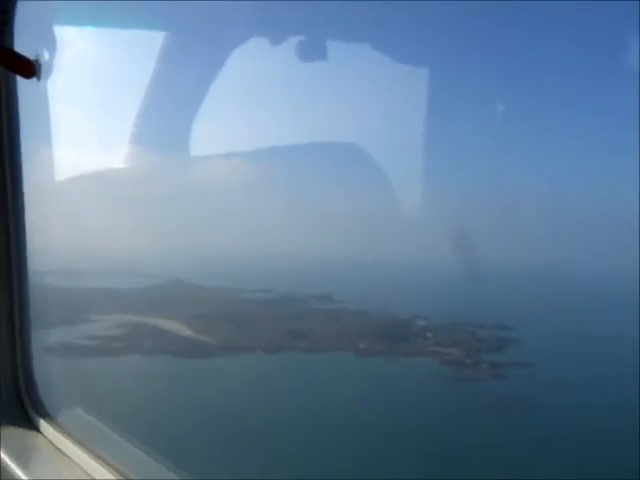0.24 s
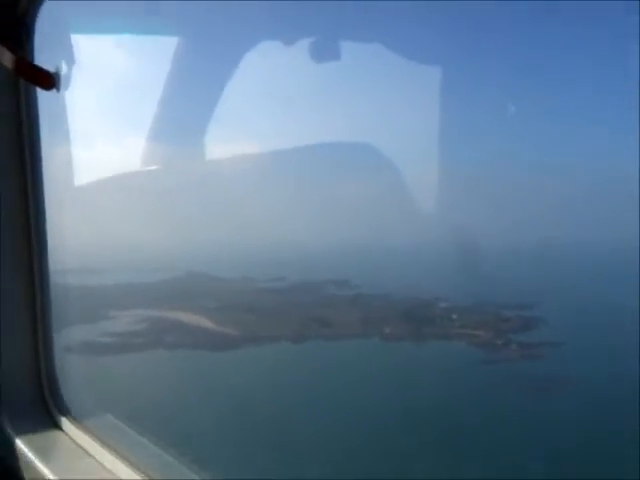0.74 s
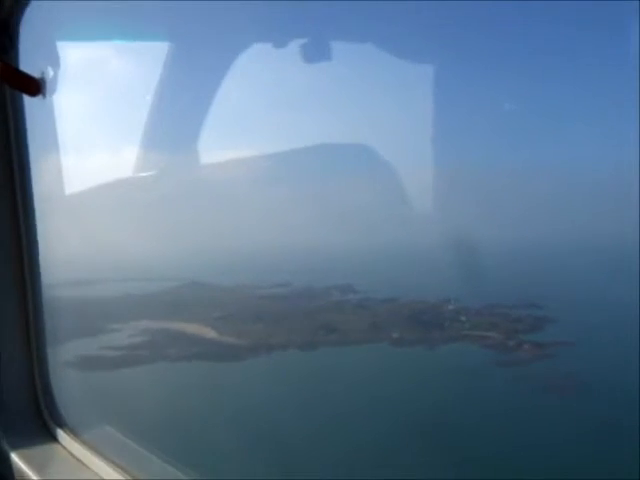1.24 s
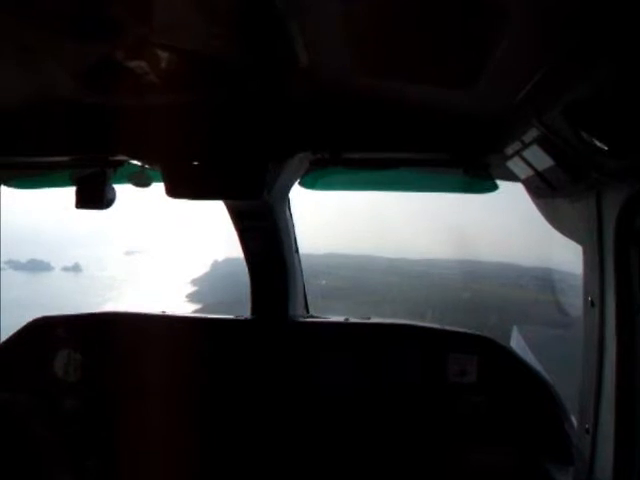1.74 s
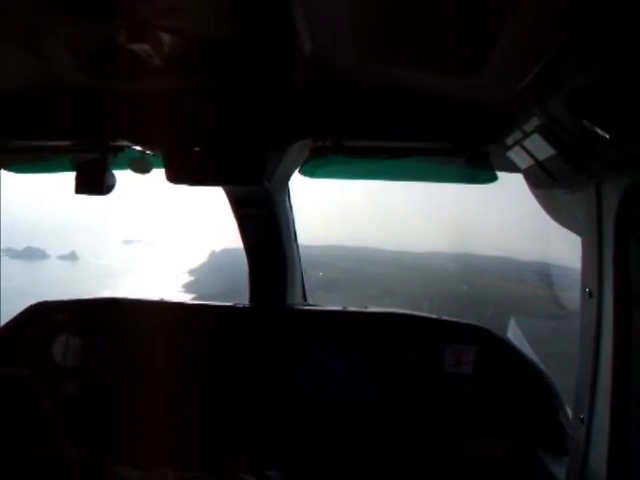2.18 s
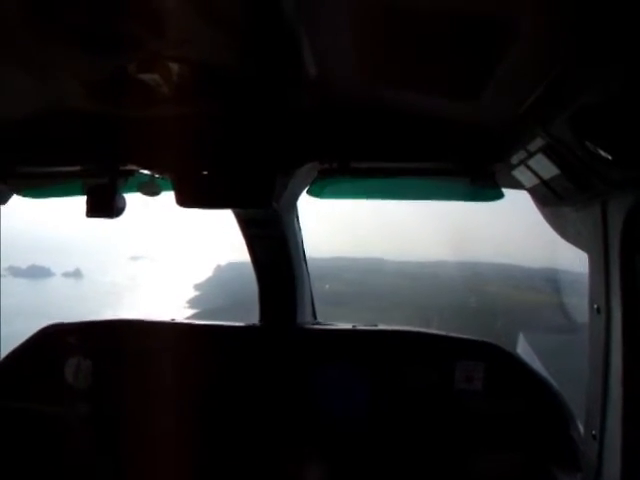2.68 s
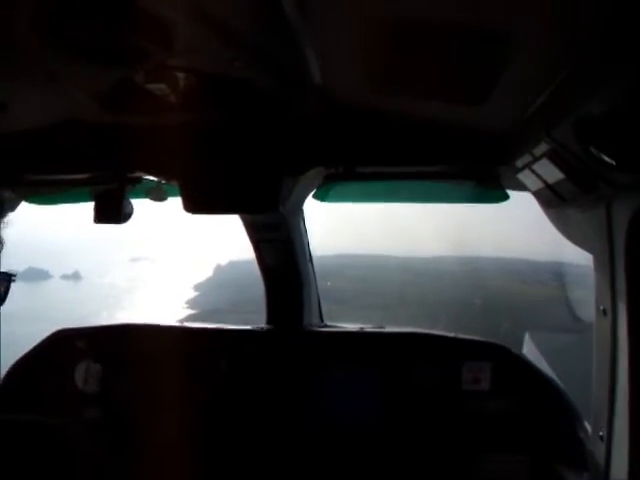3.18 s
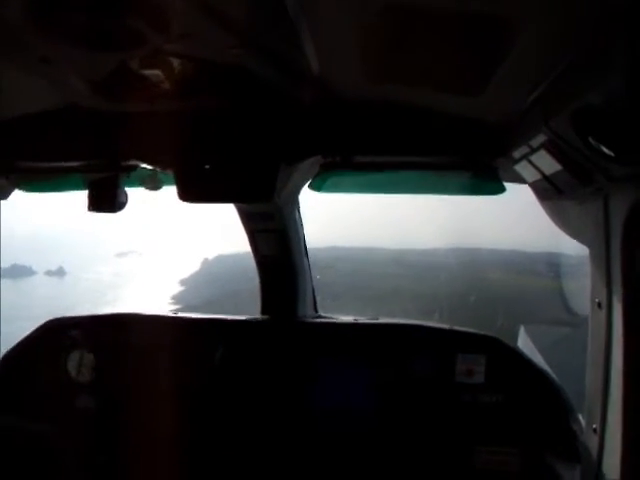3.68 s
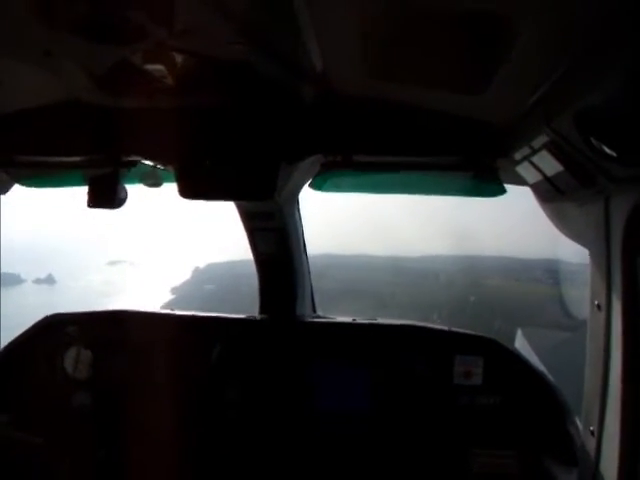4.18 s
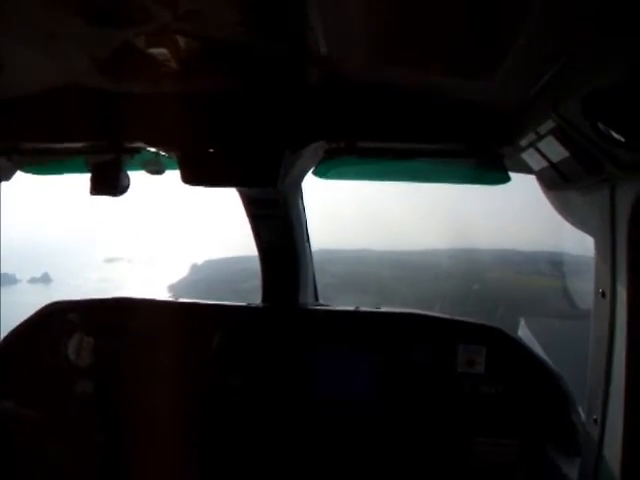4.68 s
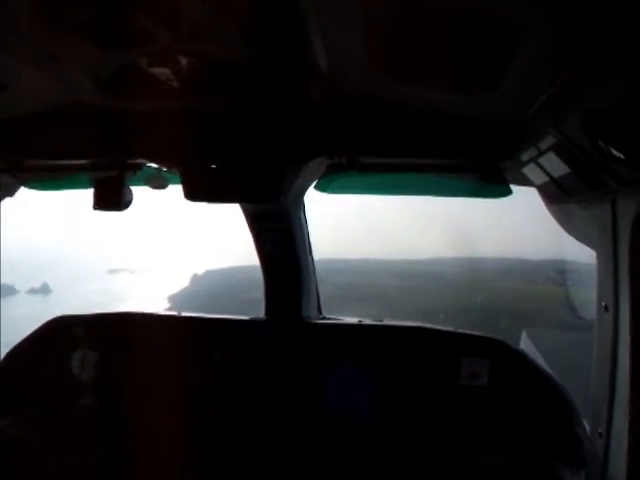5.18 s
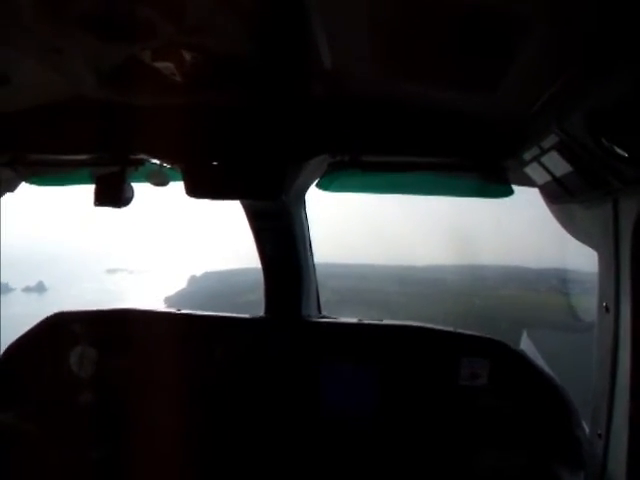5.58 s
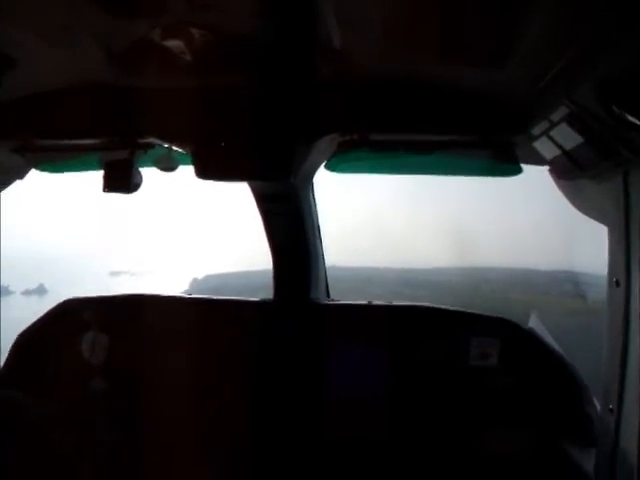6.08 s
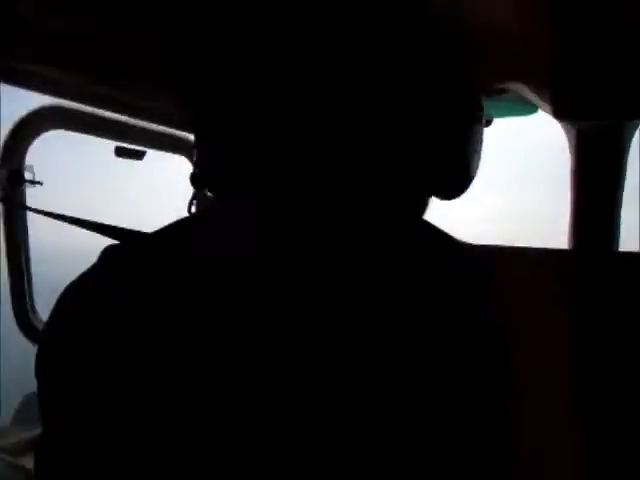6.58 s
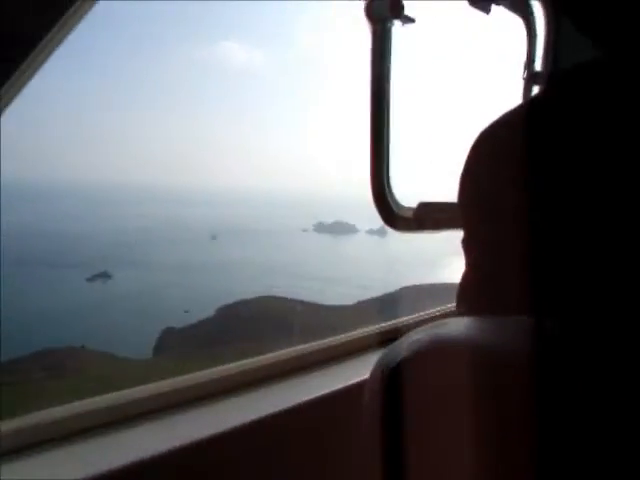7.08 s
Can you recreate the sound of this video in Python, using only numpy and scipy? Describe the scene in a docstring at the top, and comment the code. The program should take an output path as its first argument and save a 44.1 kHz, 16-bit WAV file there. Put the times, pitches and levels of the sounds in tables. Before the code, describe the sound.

Inside the cabin of a small twin-engine propeller plane, a low, lumpy drone sits under a broad rush of air near the side window. After a second or so a tiny gap cuts it off; a stronger, higher, buzzing drone snaps in, climbs slightly and throbs rapidly, hiss pumping along. Near the end the microphone swings to the side window, changing the buzz's colour and softening the rush.

```python
"""Inside the cabin of a twin piston aircraft with six-cylinder engines and three-blade propellers.
First the engines cruise almost in step: fluttering sines make a lumpy drone under a rush of filtered noise.
A silence of 24 ms follows; then the engines turn faster and out of step, their blade tones beat at roughly
7 to 13 Hz, and a limiter pumps the hiss along with the throb. Towards the end the microphone swings round
to the side window, so each harmonic passes through its own nodes and the rush of air weakens."""
import sys
import numpy as np
from scipy import signal
from scipy.fft import rfft, irfft
from scipy.io import wavfile

SR = 44100
rng = np.random.default_rng(int(sys.argv[2]) if len(sys.argv) > 2 else 0)


def wrap_up_sound(samples):
    """Save the sound to the file named by the first command line argument, as 16-bit audio."""
    columns = np.atleast_2d(samples).T
    # keep every value between -1 and 1, then stretch to whole-number steps
    tamed = np.clip(columns, -1, 1)
    steps = np.round(tamed * 32767).astype(np.int16)
    wavfile.write(sys.argv[1], SR, steps)


N = 323241
TIME = np.arange(N) / SR  # s

# Levels in the tables hold before the gain of each stretch and the limiter.
# Layers of the rush of air, edges from low to high: [f/Hz]
RUSH_EDGES_HZ = [10, 1250, 4500, 8300]
# Spectral shape of air and structure noise, which sets the balance inside each layer: [f/Hz, level/dB per Hz]
CRUISE_AIR = [(12, -50.5), (110, -44.5), (200, -51.5), (420, -55.5), (680, -62), (880, -66.5),
              (1270, -68.5), (1560, -65), (1900, -71), (2600, -68), (4200, -72.5), (5400, -78), (7400, -81)]
FAST_AIR = [(12, -56.5), (22, -42.5), (50, -48.5), (100, -53.5), (160, -51.5), (230, -57), (480, -63.5),
            (750, -71), (980, -68), (1300, -75.5), (3600, -76), (5300, -76.5), (6400, -76), (7400, -78)]
# Rms of the layers in steady airflow: [roar level/dB, middle level/dB, hiss level/dB]
CRUISE_RUSH_DB = (-27.5, -36, -45)
FAST_RUSH_DB = (-27.5, -40.5, -40.5)
# Change of the layers at the side window: [roar level/dB, middle level/dB, hiss level/dB]
WINDOW_DB = (-5, -2.5, -1)
# Strength of the airflow in the fast stretch: [t/s, level/dB]
AIRFLOW = [(1.37, 1), (1.5, 4.5), (1.75, 3), (2.1, 1.0), (3.4, -1.4), (4.8, .7), (6.0, -0.4), (6.8, 0),
           (7.33, -1.5)]
# Air leaks in the cruise: [f/Hz, bandwidth/Hz, level/dB against the roar]
CRUISE_LEAKS = [(1014, 95, -11), (1161, 84, -18.5)]
# Air leaks in the fast stretch: [f/Hz, bandwidth/Hz, level/dB against the hiss]
FAST_LEAKS = [(4690, 260, -12.5), (6210, 200, -11.5)]
# Low wavering hum under the fast stretch: [f/Hz, rms level/dB]
HUM = [(40.5, -54), (75.2, -28), (112.8, -31)]
# Engine lines; every sixth is a blade-pass and firing harmonic: [multiple of the four-stroke cycle, rms level/dB]
CRUISE_ORDERS = [(1, -30), (2, -29), (3, -35), (4, -26.5), (5, -38), (8, -37), (9, -31), (10, -43.5),
                 (11, -38), (18, -46), (22, -45.5), (30, -50)]
LEAD_ORDERS = [(1, -36), (2, -51), (3, -30.5), (5, -41), (6, -12), (8, -42.5), (9, -42.5), (10, -51),
               (11, -44.5), (12, -22), (15, -54), (18, -39), (24, -32.5), (30, -38.5), (36, -46.5),
               (42, -42), (48, -48), (54, -55.5), (60, -55.5), (66, -60), (72, -56), (78, -64.5),
               (84, -57.5), (90, -62.5)]
SLOW_ORDERS = [(3, -34), (4, -40), (6, -20), (12, -39.5), (18, -48), (24, -56), (30, -60.5), (36, -55.5)]
# Cruise tones of the two engines: [blade harmonic, rms level/dB of the first, share of the second (0-1)]
CRUISE_TONES = [(1, -23.5, 0.87), (2, -20.5, 0.25)]
# Moment at which the two engines oppose each other, one for each cruise tone: [t/s]
CANCEL_S = (.31, .51)
# Blade-pass frequency of the leading and the slower propeller in the fast stretch: [t/s, f/Hz]
LEAD_SPEED = [(1.36, 126.92), (1.6, 130.71), (2.0, 134.49), (2.45, 136.62), (3.0, 136.54), (4.3, 133.61),
              (5.5, 134.09), (7.33, 133.0)]
SLOW_SPEED = [(1.36, 119.45), (1.65, 124.1), (3.0, 124.1), (5.7, 121.92), (7.33, 119.6)]
# Cabin peaks and dips that the harmonics slide through: [f/Hz, half width/Hz, level/dB]
CABIN_MODES = [(257.3, 8, 2.5), (273.2, 4.7, -2), (522, 9.1, 5), (540, 2.7, 1.5), (630, 14, -6),
               (774, 18, 6.5), (822, 5.8, 5), (900, 13, -2), (958, 13, -7.5), (1915, 16, 3)]
# Nodes and antinodes met in the swing: [engine order, t/s, half width/s, dip or peak level/dB, later change/dB]
NODES = [(12, 6.71, .14, -11, -4), (18, 6.8, 0.16, -9.5, 6), (24, 6.55, .3, -2, -2.5),
         (30, 7.05, .4, -4.5, -0.5), (36, 6.5, 0.23, 6.5, 2), (36, 6.83, 0.095, -10.5, -0.5),
         (42, 7.4, .12, -2, -5), (48, 6.73, .08, -9, -2), (54, 6.85, .1, -2, 5.5), (60, 5.9, .15, -8, -3),
         (72, 6.68, .12, -7, -1), (84, 7.05, 0.27, -14, 5)]

BREAK_FROM_S, BREAK_TO_S = 1.335, 1.359
CRUISE_HZ = 114.5  # blade passes per second
CRUISE_SLIP_HZ = 0.67  # lag of the second engine, in blade passes per second
GUST_S, GUST_WIDTH_S, GUST_DB = 0.47, 0.19, 2.5  # one gust at the side window in the cruise
CRUISE_EASE_DB_PER_S = 1.9  # fall of the middle layer through the cruise
RASP_FROM_HZ, RASP_DB_PER_HZ, RASP_FROM_ORDER = 134.0, 2.5, 54
TURN_S, TURN_LENGTH_S = 6.33, 0.3  # swing of the microphone as the harmonics meet it: middle, length
WINDOW_S, WINDOW_FADE_S = 6.5, 0.7  # weakening of the rush at the window: middle, length
NARROW_BAND_HZ, CUTOFF_HZ = 8500, 16000  # stopband edges of the two low-pass filters


def from_db(db):
    """Logarithmic level: decibels to an amplitude ratio."""
    return 10 ** (np.asarray(db) / 20)


def rms_one(x):
    """Normalization: scale a signal to unit rms."""
    return x / np.sqrt(np.mean(x ** 2) + 1e-20)


def in_time(rows):
    """Linear interpolation: each column of a curve table at every sample."""
    s, *columns = np.transpose(rows)
    return [np.interp(TIME, s, column) for column in columns]


def bell(x, centre, width):
    """Gaussian curve: a smooth bump of height 1."""
    return np.exp(-((x - centre) / width) ** 2)


def turned(middle_s, length_s):
    """Linear motion: the completed share of the microphone's swing, 0-1."""
    return np.clip((TIME - middle_s) / length_s + 0.5, 0, 1)


def drift(rate):
    """Low-passed chance: a random curve of spread 1 that changes about rate times a second."""
    step = 100  # samples between points of the curve
    r = np.exp(-2 * np.pi * rate * step / SR)
    settle = 1000  # points discarded while the filter settles
    noise = rng.standard_normal(N // step + settle + 2)
    slow = signal.lfilter([1], [1, -2 * r, r * r], noise)[settle:]
    return np.interp(np.arange(N) / step, np.arange(len(slow)), rms_one(slow))


def tone(cycles, rough, flutter_rate):
    """Random modulation: a falling sine of rms 1 whose strength and phase flutter by the share rough."""
    angle = 2 * np.pi * cycles
    in_phase = (1 + rough * drift(flutter_rate)) * np.sin(angle)
    quadrature = rough * drift(flutter_rate) * np.cos(angle)
    return -np.sqrt(2 / (1 + 2 * rough ** 2)) * (in_phase + quadrature)


def rush(spectrum, levels_db, flow_db):
    """Turbulence: noise coloured by the cabin, in layers of roar, middle and hiss that follow the airflow."""
    hz = np.maximum(np.arange(N // 2 + 1) * SR / N, 1)
    at_hz, level_db = np.transpose(spectrum)
    colour = from_db(np.interp(np.log(hz), np.log(at_hz), level_db))
    noise = rfft(rng.standard_normal(N)) * colour
    layers = []
    for low, high, db in zip(RUSH_EDGES_HZ, RUSH_EDGES_HZ[1:], levels_db):
        layer = irfft(noise * (hz >= low) * (hz < high), N)
        layers.append(from_db(db + flow_db) * rms_one(layer))
    return layers


def whistles(rows, gust_db):
    """Narrow-band resonance: air leaking past the seals sings in noise bands that come and go."""
    out = 0
    for hz, width_hz, level_db in rows:
        r = np.exp(-np.pi * width_hz / SR)
        poles = [1, -2 * r * np.cos(2 * np.pi * hz / SR), r * r]
        band = rng.standard_normal(N)
        for _ in range(2):
            band = signal.lfilter([1, 0, -1], poles, band)
        out = out + from_db(level_db) * rms_one(band * from_db(gust_db * drift(7)))
    return out


def blade_wash(passes, depth, sharpness, uneven, gust_db):
    """Periodic modulation: each blade slaps air on the fuselage, one blade harder; mean power 1."""
    puff = np.exp(sharpness * (np.cos(2 * np.pi * passes) - 1))
    per_turn = np.cos(2 * np.pi * passes / 3)  # three blades
    slap = 1 + depth * puff * (1 + uneven * per_turn)
    return rms_one(slap * from_db(gust_db * drift(35)))


def low_hum():
    """Superposition: steady low tones whose strength and phase waver slowly."""
    return sum(from_db(db) * tone(hz * TIME + rng.random(), rough=0.17, flutter_rate=0.81) for hz, db in HUM)


def slipping_tones(passes):
    """Interference: one engine slips slowly past the other, so each tone fades and returns."""
    drone = 0
    for (harmonic, db, share), cancel_s in zip(CRUISE_TONES, CANCEL_S):
        slipped = passes - CRUISE_SLIP_HZ * (TIME - cancel_s)
        first = tone(round(harmonic) * passes, rough=0.04, flutter_rate=7.8)
        second = tone(round(harmonic) * slipped, rough=0.04, flutter_rate=7.8)
        drone = drone + from_db(db) * (first - share * second)
    return drone


def blade_passes(hz):
    """Phase as the integral of frequency: blade passes counted from the start of the fast stretch."""
    count = np.cumsum(hz) / SR
    return count - np.interp(BREAK_TO_S, TIME, count)


def harmonic_db(order, blade_hz):
    """Resonance and standing waves: cabin modes, blade-tip rasp at high speed, and nodes met by the microphone."""
    line_hz = blade_hz * order / 6
    db = sum(mode_db * bell(line_hz, hz, width_hz) for hz, width_hz, mode_db in CABIN_MODES)
    if order >= RASP_FROM_ORDER:
        db = db + RASP_DB_PER_HZ * np.maximum(blade_hz - RASP_FROM_HZ, 0)
    for node_order, s, width_s, depth_db, after_db in NODES:
        if round(node_order) == order:
            db = db + depth_db * bell(TIME, s, width_s)
            db = db + after_db * turned(TURN_S, TURN_LENGTH_S)
    return db


def engine_lines(passes, orders, blade_rough, rough_per_harmonic, cylinder_rough, flutter_rate, scatter):
    """Fourier synthesis: yields (order, wave) for blade harmonics and the lines of unequal cylinders."""
    for order, level_db in orders:
        order = round(order)
        harmonic = order / 6
        if harmonic == round(harmonic):
            # low blade harmonics align as in a sawtooth; reflections scatter the high ones
            delay = scatter * (harmonic - 1) ** 2 * rng.standard_normal()
            rough = blade_rough + rough_per_harmonic * harmonic
        else:
            delay = rng.random()
            rough = cylinder_rough
        yield order, from_db(level_db) * tone(harmonic * passes + delay, rough, flutter_rate)


def cruise():
    """Slow interference: engines almost in step give one lumpy drone under a broad rush at the side window."""
    passes = CRUISE_HZ * TIME
    flow_db = GUST_DB * bell(TIME, GUST_S, GUST_WIDTH_S)
    roar, middle, hiss = rush(CRUISE_AIR, CRUISE_RUSH_DB, flow_db)
    middle = middle * from_db(-CRUISE_EASE_DB_PER_S * TIME)
    leak = from_db(CRUISE_RUSH_DB[0]) * whistles(CRUISE_LEAKS, gust_db=2.0)
    wash = blade_wash(passes, depth=0.14, sharpness=1.8, uneven=0.6, gust_db=0.0)
    air = (roar + middle + hiss + leak) * wash
    lines = engine_lines(passes, CRUISE_ORDERS, blade_rough=0.17, rough_per_harmonic=0.045,
                         cylinder_rough=0.26, flutter_rate=2.2, scatter=0.034)
    lumps = sum(wave for order, wave in lines)
    return from_db(1.5) * (slipping_tones(passes) + lumps + air)


def fast():
    """Beats: blade tones of unequal pitch throb together, and the leading propeller chops the hiss."""
    (lead_hz,), (slow_hz,), (flow_db,) = in_time(LEAD_SPEED), in_time(SLOW_SPEED), in_time(AIRFLOW)
    # blade phases at the start, in passes
    lead = blade_passes(lead_hz) - 0.3
    slow = blade_passes(slow_hz) + 0.12

    at_window = turned(WINDOW_S, WINDOW_FADE_S)
    layers = rush(FAST_AIR, FAST_RUSH_DB, flow_db)
    roar, middle, hiss = [layer * from_db(db * at_window) for layer, db in zip(layers, WINDOW_DB)]
    leak = from_db(FAST_RUSH_DB[2] + flow_db) * whistles(FAST_LEAKS, gust_db=3.5)
    wash = blade_wash(lead, depth=0.32, sharpness=1.8, uneven=0.87, gust_db=0.67)
    chopped = (middle + hiss + leak) * wash

    slow_lines = engine_lines(slow, SLOW_ORDERS, blade_rough=0.025, rough_per_harmonic=0.046,
                              cylinder_rough=0.22, flutter_rate=2.1, scatter=0.026)
    slow_drone = sum(wave for order, wave in slow_lines)
    lead_lines = engine_lines(lead, LEAD_ORDERS, blade_rough=0.006, rough_per_harmonic=0.0085,
                              cylinder_rough=0.18, flutter_rate=3, scatter=0.014)
    lead_drone = sum(wave * from_db(harmonic_db(order, lead_hz)) for order, wave in lead_lines)
    return from_db(0.5) * (roar + chopped + low_hum() + slow_drone + lead_drone)


def scene():
    """Succession: the cruise gives way to the faster stretch at the middle of the break."""
    in_cruise = TIME < (BREAK_FROM_S + BREAK_TO_S) / 2
    return np.where(in_cruise, cruise(), fast())[None]


def limiter(x, ceiling_db, release_db_per_s, attack_s):
    """Gain reduction: peaks push the gain down quickly; it creeps back up in each trough of the beat."""
    level_db = 20 * np.log10(np.abs(x).max(axis=0) + 1e-9)
    over_db = np.maximum(level_db - ceiling_db, 0)
    release_db = release_db_per_s * TIME
    held_db = np.maximum.accumulate(over_db + release_db) - release_db
    r = np.exp(-1 / (attack_s * SR))
    return x * from_db(-signal.lfilter([1 - r], [1, -r], held_db))


def low_pass(x, edge_hz):
    """Band limitation: a steep filter that removes what lies above edge_hz."""
    return signal.sosfilt(signal.cheby2(14, 62, edge_hz, fs=SR, output="sos"), x)


def record(dry):
    """Limiting and band limitation: a quick limiter and a narrow band; the sound drops out and snaps back in."""
    limited = limiter(dry, ceiling_db=-7.0, release_db_per_s=76.5, attack_s=0.00099)
    narrow = low_pass(limited, NARROW_BAND_HZ)
    # a fade of 0.4 ms into the break, an abrupt return after it
    sounding = np.clip((BREAK_FROM_S - TIME) / 0.0004, 0, 1) + (TIME >= BREAK_TO_S)
    return low_pass(narrow * sounding, CUTOFF_HZ)


dry = scene()
out = record(dry)
wrap_up_sound(out)
```